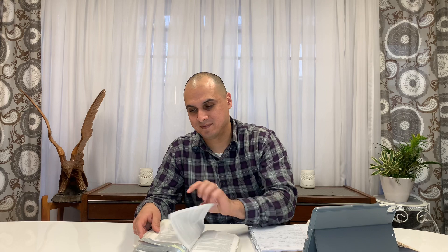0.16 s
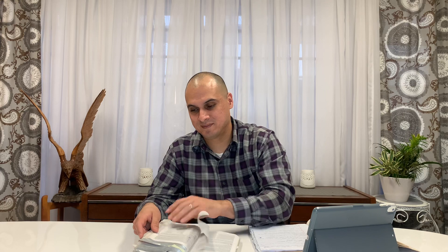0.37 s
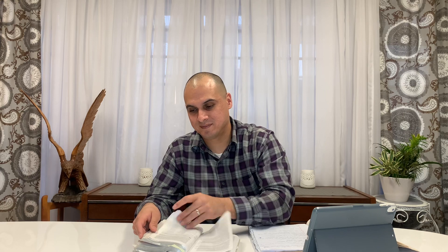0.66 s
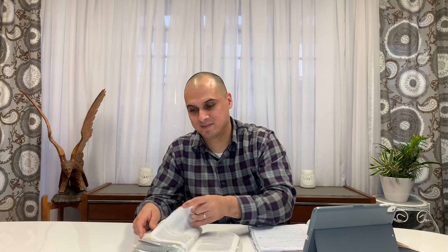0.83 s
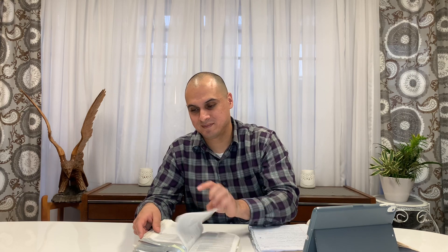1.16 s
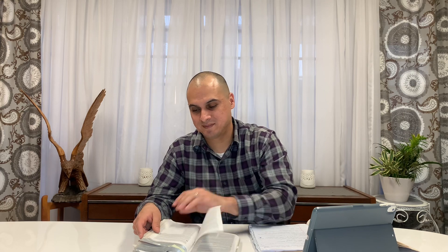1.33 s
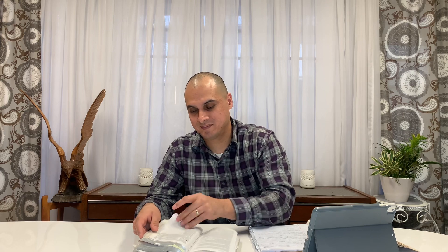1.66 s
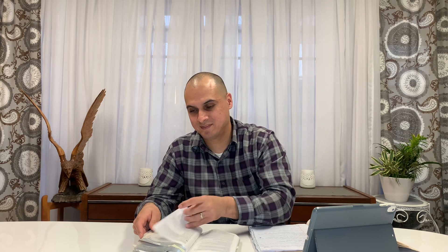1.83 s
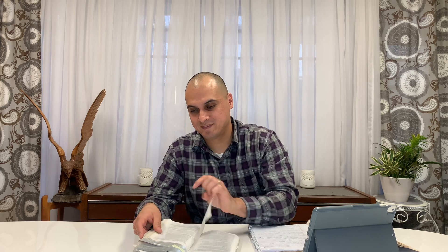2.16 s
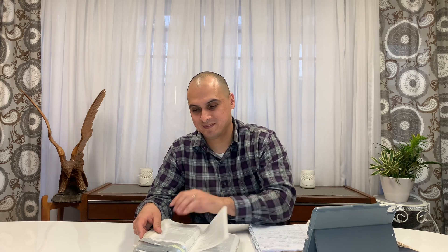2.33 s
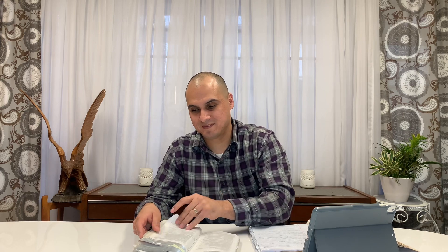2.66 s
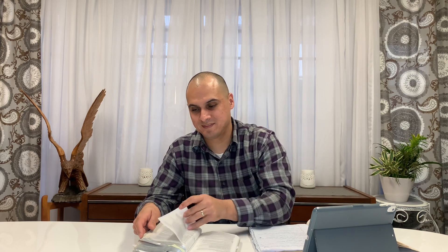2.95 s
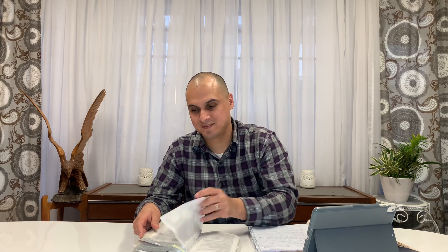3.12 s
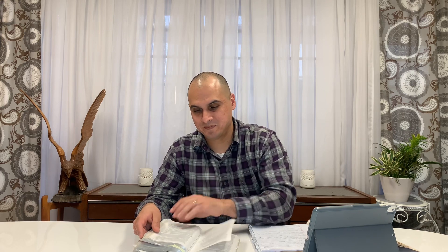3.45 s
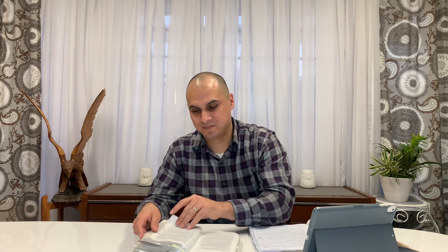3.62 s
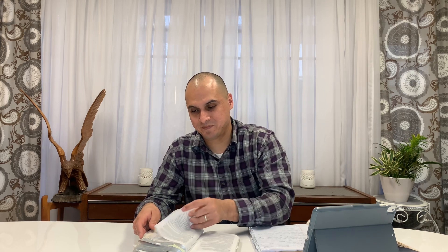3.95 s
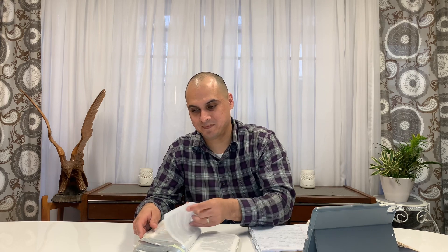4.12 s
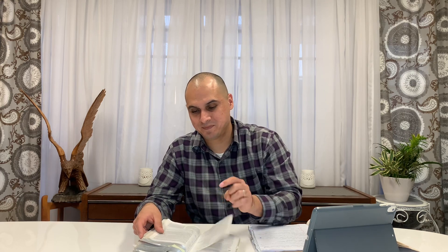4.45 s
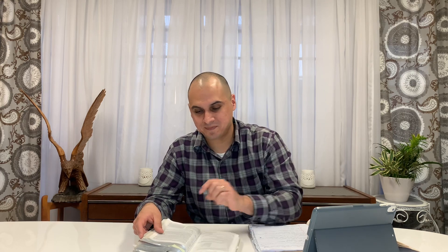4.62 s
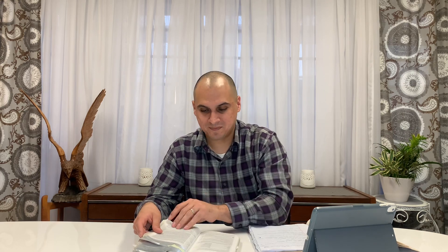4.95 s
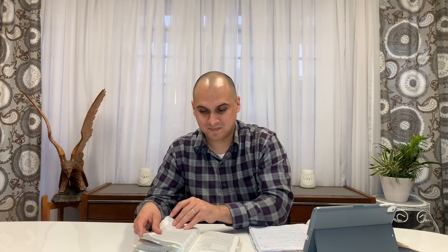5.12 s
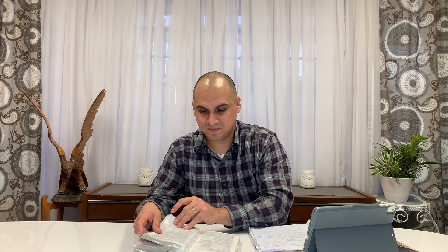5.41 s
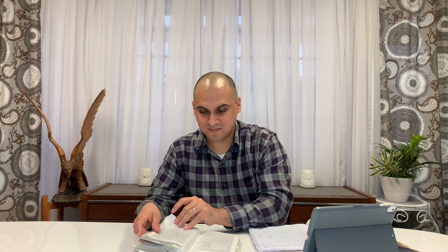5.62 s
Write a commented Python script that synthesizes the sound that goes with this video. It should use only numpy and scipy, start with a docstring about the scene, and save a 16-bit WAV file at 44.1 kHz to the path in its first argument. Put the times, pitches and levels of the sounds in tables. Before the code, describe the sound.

Thin pages of a thick book are flipped one by one, each with crisp rustles, crackles and a quick swish, in a quiet room.

```python
"""Paper hisses, rustles and crackles as someone leafs through a thick book of thin pages at a table.
Fingers slide each sheet in short strokes (shaped noise), and it buckles with tiny sharp bursts.
It whips straight and lands with a swish; flaps, low gliding notes and light touches join in.
Behind it: a short room ring, quiet air, dull table bumps and a low drone like distant traffic.
A phone a little way off hears all this through two ports, as left and right."""
import sys
import numpy as np
from scipy import signal
from scipy.fft import rfft, irfft
from scipy.io import wavfile
from scipy.ndimage import uniform_filter1d, map_coordinates

SR = 44100
rng = np.random.default_rng(int(sys.argv[2]) if len(sys.argv) > 2 else 0)


def master_out(mix):
    """Clip the mix to full scale and print it as 16-bit PCM to the path in sys.argv[1]."""
    frames = np.transpose(np.atleast_2d(mix))
    ceiling = np.clip(frames, -1, 1)
    pcm = np.round(ceiling * 32767).astype(np.int16)
    wavfile.write(sys.argv[1], SR, pcm)


N = 254898
T = np.arange(N) / SR  # time of every sample, s
FREQS = np.fft.rfftfreq(N, 1 / SR)  # Hz

# fingers slide a sheet; levels before a small trim of each layer:
# start_s, length_s, attack_s, hiss_db (rubbing surfaces), rustle_db (bending sheet)
STROKES = [(0.0, 0.11, 0.00018, -61.5, -49), (0.276, 0.16, 0.0037, -71, -59),
           (0.485, 0.034, 0.0055, -62.5, -53.5), (0.577, 0.25, 0.042, -58, -55.5),
           (0.687, 0.065, 0.029, -43.5, -49.5), (0.778, 0.1, .01, -68.5, -57.5),
           (0.867, 0.18, 0.037, -87, -61), (0.997, 0.077, 0.013, -55.5, -51.5),
           (1.524, 0.11, 0.046, -73, -67), (1.641, 0.15, 0.066, -49, -50),
           (1.742, 0.038, 0.034, -40.5, -41.5), (1.814, 0.037, .01, -75, -55),
           (1.895, 0.094, 0.079, -51, -43.5), (2.384, 0.18, 0.013, -79, -73),
           (2.529, 0.077, 0.01, -62, -70.5), (2.676, 0.25, 0.011, -55.5, -57),
           (2.942, 0.027, 0.0084, -57.5, -56), (3.046, 0.033, 0.0088, -72, -62),
           (3.101, 0.063, 0.0084, -54.5, -48.5), (3.509, 0.054, 0.0039, -81, -65),
           (3.566, 0.032, 0.0066, -66.5, -62), (3.689, 0.17, 0.012, -51, -60.5),
           (3.801, 0.075, 0.023, -40, -45.5), (3.897, 0.17, 0.0056, -62, -55),
           (4.074, 0.21, 0.0058, -86.5, -62), (4.192, 0.035, 0.0037, -67, -55.5),
           (4.249, 0.01, 0.002, -49.5, -51), (4.735, 0.077, 0.0099, -76, -70),
           (4.945, 0.6, 0.04, -86.5, -88), (5.415, 0.047, 0.03, -69, -75),
           (5.505, 0.081, 0.015, -78, -65.5), (5.564, 0.037, 0.035, -45.5, -73),
           (5.74, 0.04, 0.0073, -72, -66)]
HISS_RELEASE_S, RUSTLE_RELEASE_S = 0.03, 0.032
# a sheet slips off the finger, whips straight and brushes down onto the stack; hiss and rustle before trim:
# start_s, hiss_db, rustle_db, whip_db, settling_s
TURNS = [(0.114, -52, -49, -48, 0.16), (1.121, -51, -47.5, -40.5, 0.19), (2.009, -51.5, -49.5, -60, 0.23),
         (3.135, -49, -58, -48, 0.25), (4.257, -41, -43.5, -39, 0.16)]
TURN_ATTACK_S, TURN_HOLD_S = 0.0028, 0.036
TURN_HISS_FADE_S, TURN_RUSTLE_FADE_S, WHIP_FADE_S = 0.032, 0.044, 0.032
SETTLE_DB, SETTLE_FADE_S = -20, 0.066  # the turned sheet rustles on, this far below its sweep
# unevenness of the rustle, and the rustle level at which half of it is reached
FLEX_DB, FLEX_ONSET_DB = 7.5, -58

# single buckles and ticks, loud to very faint:
# snap_peak_s, snap_energy_db, pop_energy_db, snap_length_ms (rough), pop_ring_hz
CRACKLES = [(0.0055, -29, -22.5, 0.9, 1350), (0.022, -23, -24.5, 0.84, 2900), (0.042, -41, -30, 0.72, 4300),
            (0.0593, -44, -24.5, 1.6, 2260), (0.1107, -24, -24.5, 1.35, 4120),
            (0.1207, -13, -39, 0.72, 5000), (0.1438, -27, -19.5, 0.18, 4930),
            (0.1727, -38, -23.5, 1.8, 2460), (0.2963, -42, -29, 0.91, 2700),
            (0.308, -27, -28.5, 0.31, 4950), (0.5063, -34, -40, 0.8, 5300), (0.5165, -37, -43, 0.39, 2400),
            (0.561, -39, -51, 0.35, 5500), (0.7145, -5.5, -20.5, 0.51, 6100),
            (0.7448, -10, -32, 0.72, 6030), (0.753, -26.5, -20, 1.26, 2830),
            (0.7595, -28, -24.5, 1.33, 2510), (0.7707, -30, -22.5, 0.22, 1720),
            (0.7877, -19.5, -30, 0.41, 5990), (0.7944, -20, -22.5, 0.43, 4740), (0.8, -24, -27, 0.44, 5730),
            (0.823, -20, -20.5, 2.14, 5000), (0.974, -59, -32, 0.66, 1800),
            (1.0098, -25, -22.5, 0.98, 1440), (1.0142, -32, -17, 0.47, 5900),
            (1.0219, -14, -17, 0.45, 1360), (1.083, -20, -19.5, 0.35, 4500), (1.12, -34, -20, 0.72, 2200),
            (1.125, -11, -15, 1.66, 1530), (1.1266, -8.5, -22.5, 1.1, 2160), (1.139, -16, -14, 1.75, 4800),
            (1.607, -49, -36, 1.9, 2700), (1.6748, -25, -46, 0.25, 5990), (1.7648, -12.5, -29, 0.51, 2240),
            (1.7745, -15, -21.5, 0.79, 2640), (1.785, -16, -20.5, 0.71, 1270),
            (1.8474, -25, -31, 0.47, 3100), (1.904, -43, -27.5, 1.3, 1250),
            (1.9142, -16.5, -19, 0.96, 1390), (1.972, -25, -28, 0.68, 5700), (2.0077, -24, -23, 1.38, 3760),
            (2.0239, -17, -23.5, 0.83, 2820), (2.0333, -29, -25.5, 1.24, 2300),
            (2.4064, -34.5, -34.5, 0.55, 2430), (2.436, -43, -41.5, 0.55, 2820),
            (2.455, -46, -48, 0.79, 4000), (2.5475, -24.5, -35.5, 0.89, 5990),
            (2.5535, -25, -28.5, 0.52, 6000), (2.5995, -23.5, -34, 0.9, 6050), (2.7, -29, -37, 0.55, 5170),
            (2.716, -29, -27, 1.15, 5670), (2.8719, -25, -27.5, 0.6, 3140), (2.9482, -19, -27, 0.35, 5730),
            (2.9518, -22.5, -22.5, 1.07, 1010), (2.969, -37, -34, 0.56, 4600),
            (2.978, -38, -29.5, 0.8, 2100), (2.9976, -23.5, -36, 0.54, 4990),
            (3.007, -42, -28.5, 0.85, 1590), (3.062, -40, -29.5, 1.1, 1240), (3.081, -41, -31, 1.3, 1300),
            (3.11, -17.5, -24, 1.32, 5730), (3.1311, -33, -21, 0.89, 5330), (3.1429, -18, -14, 1.75, 4740),
            (3.1528, -32, -15, 0.7, 4540), (3.1556, -10.5, -13, 0.49, 4050),
            (3.4612, -31.5, -38.5, 0.43, 3440), (3.5887, -29, -37, 0.71, 4780),
            (3.6995, -23, -27.5, .8, 2500), (3.704, -15.5, -28, 0.9, 2520), (3.714, -23, -36, 0.51, 2500),
            (3.7772, -19.5, -25, 0.45, 5990), (3.839, -4.5, -12.5, 1.06, 5600),
            (4.004, -43, -29.5, 0.94, 2370), (4.0431, -22, -42, 0.46, 4830), (4.088, -47, -38, 0.71, 5730),
            (4.1956, -27, -20.5, 1.2, 1890), (4.1967, -23.5, -23.5, 1.5, 4800), (4.259, -7, -9, 0.6, 4520),
            (4.2596, -30.5, -19.5, 0.93, 1310), (4.2679, -18, -30, 1.6, 3700),
            (4.487, -40, -35, 0.46, 3450), (4.768, -43.5, -43, 1.1, 5270), (4.775, -42.5, -43, 0.4, 5300),
            (4.833, -45.5, -47, 0.46, 4000), (5.297, -50, -58, 0.4, 2830), (5.5125, -27, -41, 0.61, 4980),
            (5.516, -34, -41, 0.65, 4910), (5.55, -25, -35, 0.45, 5770), (5.5653, -22, -33, 0.32, 4120),
            (5.598, -19.5, -35, 1.2, 4570), (5.6001, -21, -29.5, 0.89, 4274), (5.623, -17, -28, 0.64, 5900)]
POP_STRETCH = 2.37  # pop length over snap length
POP_RING_DB, POP_RING_WIDTH = 13, 0.087  # height of a pop's ring; half-width as a share of its pitch
# small buckles at random times; energies relative to hiss and rustle, shifted by up to the spread
# around 5 dB below these values
SMALL_PER_S, SMALL_MS, SMALL_SNAP_DB, SMALL_POP_DB, SMALL_SPREAD_DB = 160, 0.16, 11, 10.5, 10
SMALL_LOWEST_HZ, SMALL_HIGHEST_HZ = 990, 6000  # range of pop rings

# the sheet flexes and flaps, low and hollow: start_s, level_db, fading_s
FLAPS = [(0.0, -54.5, 0.054), (0.415, -66.5, 0.032), (0.8, -57, 0.072), (1.005, -61.5, 0.026),
         (1.124, -68.5, 0.01), (1.765, -51.5, 0.053), (1.912, -39, 0.0043), (1.93, -64, 0.064),
         (1.985, -44, 0.0092), (2.71, -64.5, 0.34), (2.948, -46, 0.015), (3.14, -58.5, 0.035),
         (3.583, -57.5, 0.015), (3.70, -56.5, 0.14), (3.837, -43, 0.0051), (3.9, -62.5, 0.14),
         (4.258, -39.5, 0.012), (5.598, -57.5, 0.024)]
FLAP_SHARE_DB = -18.5  # flapping that follows the rustle, relative to it
# low, hollow notes of the arched sheet: start_s, length_s, level_db, from_hz, to_hz
BILLOWS = [(0.0, 0.02, -57.5, 366, 414), (0.066, 0.067, -71, 370, 330), (1.009, 0.074, -70.5, 399, 330),
           (1.932, 0.06, -62, 251.5, 317), (2.008, 0.092, -71.5, 240.5, 271), (2.954, 0.03, -64, 440, 375),
           (3.831, 0.016, -57, 410, 402), (4.241, 0.032, -59.5, 400, 354)]
BILLOW_WOBBLES_PER_S, BILLOW_ATTACK_S, BILLOW_RELEASE_S = 180, 0.0027, 0.011
# light touches of the hand on the book: start_s, energy_db, ring_hz, fading_ms
TAPS = [(1.392, -45, 2400, 2), (1.4418, -44, 1340, 2.5), (1.465, -47.5, 1800, 2), (1.554, -52, 1060, 2),
        (2.214, -43, 2000, 2.9), (2.272, -44, 2412, 3), (2.388, -45, 2300, 2.4), (3.337, -44, 2205, 2),
        (3.523, -44, 1500, 2), (4.724, -42.5, 3250, 1.6), (4.753, -38, 4120, 1.34), (4.768, -36, 1890, 1.3),
        (4.774, -41, 2100, 1.3), (4.833, -39, 1460, 1.1), (4.893, -38, 3590, 1.6),
        (4.975, -52.5, 2350, 2.5), (5.022, -51.5, 3936, 1.6), (5.061, -52, 2490, 1.87),
        (5.09, -46.5, 3390, 4), (5.096, -37.5, 2000, 3.7), (5.23, -51.5, 1807, 1.5),
        (5.296, -49.5, 2800, 2.1), (5.315, -49, 3200, 2), (5.745, -42.5, 1480, 2.34)]
TAP_RING_DB_PER_MS, TAP_RING_HZ = 7, 260  # a longer touch has a clearer pitch; half-width of its ring

# sound colours, only their shape counts: frequency_hz, relative_level_db
HISS = [(400, -45), (2500, -26.5), (5500, -12.5), (7000, -4.5), (9200, 2), (11000, -1.5), (12500, -4),
        (14500, -3.5), (15600, -21.5), (16300, -38)]
RUSTLE = [(40, -29.5), (250, -13.5), (400, -6), (600, -14), (820, -7), (1050, -6), (1350, -4), (2400, 0),
          (3300, -0.5), (4700, -2), (6500, -1.5), (9000, -17), (15000, -24)]
SNAP = [(400, -41.5), (2500, -35.5), (5500, -4.5), (7000, -3), (8300, 3), (9500, 1), (11000, 0.5),
        (12000, -14.5), (13300, 0.5), (14500, -10), (15600, -12), (16300, -29)]
WHIP = [(600, -13.5), (1100, -38), (2200, -3), (3100, -1), (4600, 14), (6500, 11), (9000, -24),
        (15000, -27)]
FLAP = [(30, -26.5), (130, 1), (250, -2), (370, -3), (500, -5), (630, -3.5), (820, 5), (1020, 2), (1300, 2),
        (2000, -5.5), (5000, -35.5)]
TAP = [(300, -35), (700, -32), (1400, 2), (1950, 3.5), (3500, -0.5), (4500, -2), (8000, -8), (14000, -21)]
BUMP = [(20, -20.5), (40, -6.5), (70, 2.5), (125, 0.5), (200, -8), (260, -15.5), (600, -45), (2000, -54)]
AIR = [(22, -21.5), (40, -11), (62, 1.5), (100, -0.5), (150, -11.5), (250, -21), (450, -29), (800, -34.5),
       (2000, -40), (6000, -45.5), (10000, -44), (16000, -55.5)]
# echo from all round, a change of colour: frequency_hz, relative_level_db
AROUND = [(200, 3.5), (1000, 3), (3000, 2.5), (6000, 6), (9000, 6.5), (15000, -3.5)]

# time for the room's ring to fall by 60 dB: frequency_hz, ring_time_s
ROOM_T60_S = [(200, 0.36), (800, 0.3), (2200, 0.39), (4500, 0.34), (7000, 0.34), (10000, 0.042),
              (16000, 0.059)]
# balance of the ring across pitch, before its mix level: frequency_hz, relative_level_db
ROOM_DB = [(200, -0.5), (800, -6), (2500, -3), (4500, -9), (9000, -17), (15000, -37)]
# the phone's two ports hear the book differently
# frequency_hz, left_lead_radians
PORT_PHASE = [(100, 0), (1800, .7), (3000, 1.9), (5000, 2.2), (5900, 3.2), (7800, 2.8), (8600, .7),
              (9600, 0), (11500, -2.9), (12200, -3.2), (13400, -6.1), (14700, -6.5), (15500, -9)]
# frequency_hz, left_minus_right_db
PORT_BALANCE = [(100, 2.5), (500, -3), (1200, 0.5), (2500, -2), (4800, -4.5), (7000, -4), (9000, 1),
                (15000, -2)]
TOP_HZ = 16300

# distant drone, before random wandering and trim: time_s, pitch_hz, level_db
DRONE = [(0, 63.23, -67), (.9, 62.66, -63.5), (1.12, 49.4, -50), (1.33, 56.3, -56.5), (1.55, 60.26, -44.5),
         (1.8, 61.43, -47), (2.0, 62.44, -47), (2.3, 63, -48.5), (2.55, 60.3, -54), (2.9, 64.2, -63),
         (3.8, 62.57, -62.5), (4.35, 62.5, -69), (5.0, 62.76, -76), (5.78, 65.9, -57)]
# dull bumps of arms and book on the table, before the port trim: start_s, level_db
BUMPS = [(0.36, -57), (2.0, -61), (2.17, -71.5), (3.241, -64.5), (3.49, -55.5), (3.7, -57.5), (4.082, -57),
         (4.36, -60.5), (4.529, -66.5), (4.731, -60), (5.28, -78), (5.57, -54.5), (5.7, -59.5)]
AIR_DB = -61  # before the port trim


def motion():
    """How strongly the paper hisses and rustles: finger strokes, then the turn and its settling."""
    hiss_power, rustle_power = np.zeros(N), np.zeros(N)
    for s, length_s, attack_s, hiss_db, rustle_db in STROKES:
        hiss_power += (amp(hiss_db) * envelope(s, length_s, attack_s, HISS_RELEASE_S)) ** 2
        rustle_power += (amp(rustle_db) * envelope(s, length_s, attack_s, RUSTLE_RELEASE_S)) ** 2
    for s, hiss_db, rustle_db, _, settle_s in TURNS:
        hiss_power += (amp(hiss_db) * envelope(s, TURN_HOLD_S, TURN_ATTACK_S, TURN_HISS_FADE_S)) ** 2
        sweep = envelope(s, TURN_HOLD_S, TURN_ATTACK_S, TURN_RUSTLE_FADE_S)
        settle = amp(SETTLE_DB) * envelope(s, settle_s, TURN_ATTACK_S, SETTLE_FADE_S)
        rustle_power += amp(rustle_db) ** 2 * (sweep ** 2 + settle ** 2)
    return np.sqrt(hiss_power), np.sqrt(rustle_power)


def sliding(hiss, rustle):
    """Paper slides in small jerks: the surfaces hiss and the bending sheet rustles."""
    jerks = unit(amp(2.0 * walk(rate=100)))
    slips = jerks * friction(grain_rate=450, spread_db=6.0, grain_db=-5.0)
    slips = bend(slips, depth_db=4, rate=70, width_hz=260)
    # the sheet gives way unevenly, more so the harder it is bent
    unevenness_db = FLEX_DB * rustle / (rustle + amp(FLEX_ONSET_DB))
    steps = amp(unevenness_db * walk(rate=70))
    flexing = steps / np.sqrt(uniform_filter1d(steps ** 2, size=2048))  # keeps the local loudness
    hissing = colour(slips, HISS) * hiss * amp(0.5)
    rustling = colour(slips, RUSTLE) * flexing * rustle * amp(-2.5)
    return hissing + rustling


def friction(grain_rate, spread_db, grain_db):
    """Countless fibres slipping as smooth noise, and among them single catches of uneven size."""
    sizes = amp(spread_db * np.minimum(rng.exponential(size=N), 3))
    catches = (rng.random(N) < grain_rate / SR) * sizes
    fading = signal.lfilter([1], [1, -np.exp(-1 / (0.00087 * SR))], catches)  # each fades in 0.87 ms
    grains = fading * rng.standard_normal(N)
    return unit(rng.standard_normal(N) + amp(grain_db) * unit(grains))


def bend(x, depth_db, rate, width_hz):
    """A bending sheet keeps changing its resonances: patches of the spectrum swell and sink."""
    hz, s, cells = signal.stft(x, SR, nperseg=512)
    place = np.meshgrid(hz / width_hz, s * rate, indexing='ij')
    patches = map_coordinates(rng.standard_normal((256, 1024)), place, order=2, mode='wrap')
    return signal.istft(cells * unit(amp(depth_db * patches)), SR)[1][:N]


def crackles(hiss, rustle):
    """Each buckle is a crisp snap and a duller, longer pop; small ones are strewn among the listed ones."""
    buckles = [(s, amp(snap_db), amp(pop_db), ms, hz) for s, snap_db, pop_db, ms, hz in CRACKLES]
    buckles += small_buckles(hiss, rustle)
    out = np.zeros(N)
    for s, snap, pop, ms, hz in buckles:
        snap_noise, pop_noise = rng.standard_normal(size=(2, 1024))
        start = s - 512 / SR - ms / 1000 / 3  # allow for the leading silence and the snap's rise
        add(out, start, snap * buckle(snap_noise, ms, SNAP))
        add(out, start, pop * buckle(pop_noise, POP_STRETCH * ms, RUSTLE, hz, POP_RING_DB))
    return out


def small_buckles(hiss, rustle):
    """Fine buckles come at chance moments, as strong as the hiss and rustle of the sheet allow."""
    count = int(SMALL_PER_S * N / SR)
    places = rng.integers(N, size=count)
    sizes = amp(SMALL_SPREAD_DB * (2 * rng.random(size=(count, 2)) - 1.5))
    rings = rng.uniform(SMALL_LOWEST_HZ, SMALL_HIGHEST_HZ, size=count)
    snaps = hiss[places] * sizes[:, 0] * amp(SMALL_SNAP_DB)
    pops = rustle[places] * sizes[:, 1] * amp(SMALL_POP_DB)
    return [(T[i], snap, pop, SMALL_MS, hz) for i, snap, pop, hz in zip(places, snaps, pops, rings)]


def buckle(noise, ms, spectrum, ring_hz=1, ring_db=0):
    """A burst of energy 1, about ms long, then a short shiver of the sheet; the patch may ring."""
    t = T[:len(noise)]
    rise_s = ms / 1000 / 3
    pulse = t / rise_s * np.exp(1 - t / rise_s)
    shiver = amp(-20) * np.exp(-t / .004)
    burst = np.pad(noise * (pulse + shiver), (512, 0))  # the colouring also spreads backwards in time
    hz = np.fft.rfftfreq(len(burst), 1 / SR)
    ring = ring_db / (1 + ((hz / ring_hz - 1) / POP_RING_WIDTH) ** 2)
    burst = irfft(rfft(burst) * amp(at(spectrum, hz) + ring))
    return burst / np.linalg.norm(burst)


def swishes(table, spectrum, following=0):
    """Sudden sweeps of a sheet: grainy noise that starts within milliseconds and fades.
    A further part may follow a given level, such as that of the rustle."""
    t, swell = T[:SR // 2], np.zeros(N)
    for s, db, fading_s in table:
        add(swell, s, amp(db) * (1 - np.exp(-t / 0.0026)) * np.exp(-t / fading_s))
    grainy = friction(grain_rate=800, spread_db=4.5, grain_db=1.5)
    flutter = bend(grainy, depth_db=-2.5, rate=120, width_hz=250)
    return colour(flutter, spectrum) * np.hypot(swell, following)


def billows():
    """The curved sheet sounds a low, breathy resonance that glides as its arch changes."""
    out = np.zeros(N)
    for s, length_s, db, from_hz, to_hz in BILLOWS:
        pitch_hz = np.interp(T, [s, s + length_s], [from_hz, to_hz])
        phase = 2 * np.pi * np.cumsum(pitch_hz) / SR
        # two random swells make the note breathy
        wobble = walk(BILLOW_WOBBLES_PER_S) * np.cos(phase) + walk(BILLOW_WOBBLES_PER_S) * np.sin(phase)
        out += amp(db) * unit(wobble) * envelope(s, length_s, BILLOW_ATTACK_S, BILLOW_RELEASE_S)
    return out


def taps():
    """Faint, dry touches that ring for a few milliseconds, each at the pitch of the touched spot."""
    t, out = T[:2048], np.zeros(N)
    hz = np.fft.rfftfreq(len(t), 1 / SR)
    for s, db, ring_hz, ms in TAPS:
        ring_db = TAP_RING_DB_PER_MS * ms / (1 + ((hz - ring_hz) / TAP_RING_HZ) ** 2)
        touch = rng.standard_normal(len(t)) * np.exp(-1000 * t / ms)
        touch = irfft(rfft(touch) * amp(at(TAP, hz) + ring_db))
        touch *= np.minimum(1, 4 * (1 - t / t[-1]))  # smooth end
        add(out, s, amp(db) * touch / np.linalg.norm(touch))
    return out


def room_ring(x, count=8):
    """The room's diffuse echo, shortest in the treble; a wandering mix of tails, as for a moving page."""
    t, tails = T[:SR // 2], 0
    for k, band in enumerate(bands(rng.standard_normal(N), count=10)):
        hz = (k / 10) ** 2 * SR / 2
        fade = amp(-60 * t / at(ROOM_T60_S, hz)) * np.clip((t - .002) / .006, 0, 1)  # starts after 2 ms
        noises = band[:count * len(t)].reshape(count, len(t))
        tails = tails + noises * fade / np.linalg.norm(fade) * amp(at(ROOM_DB, hz))
    shares = np.array([walk(rate=16) for _ in range(count)])
    shares = shares / np.linalg.norm(shares, axis=0)
    return signal.fftconvolve(x * shares, tails, axes=1).sum(0)[:N]


def ports(x):
    """Sound from the book's side reaches the two ports with different phase and level."""
    half = amp(at(PORT_BALANCE, FREQS) / 2) * np.exp(.5j * at(PORT_PHASE, FREQS))
    return irfft(rfft(x) * np.array([half, 1 / half]), N)


def background():
    """Room air, drone and bumps, with a small level difference between the ports."""
    return (room_air() + drone() + bumps()) * amp([[-1.3], [1.2]])


def room_air():
    """Quiet air noise: nearly alike at both ports in the bass, mostly separate in the treble."""
    shared, left, right = (colour(rng.standard_normal(N), AIR) for _ in range(3))
    apart = at([(60, 0.087), (200, 0.6), (800, 0.96)], FREQS)  # (Hz, separate share)
    return amp(AIR_DB) * irfft(rfft(shared) * np.sqrt(1 - apart ** 2) + rfft([left, right]) * apart, N)


def drone():
    """A low tone swells and fades like distant traffic, wavering in pitch and level."""
    s, hz, db = np.transpose(DRONE)
    pitch_hz = np.interp(T, s, hz) + 1.3 * walk(rate=6.4)
    level_db = np.interp(T, s, db) + 2.54 * walk(rate=11) - 4.5
    return np.sqrt(2) * np.sin(2 * np.pi * np.cumsum(pitch_hz) / SR) * amp(level_db)


def bumps():
    """Arms and book knock dully on the table: swells of low noise over a faint steady rumble."""
    leaning = sum(amp(db) * envelope(s, hold_s=0.039, attack_s=0.013, release_s=0.088) for s, db in BUMPS)
    return colour(rng.standard_normal(N), BUMP) * np.hypot(leaning, amp(-71))


def amp(db):
    """Decibels to gain."""
    return 10 ** (np.asarray(db) / 20)


def unit(x):
    """Scale to an average strength (rms) of 1."""
    return x / np.sqrt(np.mean(x ** 2))


def envelope(s, hold_s, attack_s, release_s):
    """Rise from time s, hold, then fade."""
    t = np.maximum(T - s, 0)
    return (1 - np.exp(-t / attack_s)) * np.exp(-np.clip((t - hold_s) / release_s, 0, 20))


def at(points, hz):
    """Read (Hz, value) points on a log-frequency axis."""
    f, value = np.transpose(points)
    return np.interp(np.log(hz + 1), np.log(f), value)


def colour(x, spectrum):
    """Give x a spectrum; white input keeps its power."""
    return irfft(rfft(x) * unit(amp(at(spectrum, FREQS))), N)


def walk(rate):
    """Smooth random wandering, spread near 1, through `rate` random points a second."""
    knots = rng.standard_normal(4096)
    return 0.97 * map_coordinates(knots, [T * rate], order=2, mode='wrap')


def bands(x, count):
    """Split x into overlapping bands that add up to x again, narrower in the bass."""
    place = np.sqrt(FREQS / FREQS[-1]) * count
    spectrum = rfft(x)
    return [irfft(spectrum * np.maximum(1 - abs(place - k), 0), N) for k in range(count + 1)]


def add(track, s, sound):
    """Mix a sound into a track from time s on."""
    start = max(int(s * SR), 0)
    part = sound[:max(N - start, 0)]
    track[start:start + len(part)] += part


def delayed(x, ms):
    """x heard over a path whose delay changes."""
    return map_coordinates(x, [(T - ms / 1000) * SR], order=3)


def scene():
    """The paper, its echo from the table's side, the echo from all round, and the background."""
    hiss, rustle = motion()
    whips = swishes([(s, db, WHIP_FADE_S) for s, _, _, db, _ in TURNS], WHIP)
    flaps = swishes(FLAPS, FLAP, following=amp(FLAP_SHARE_DB) * rustle)
    paper = sliding(hiss, rustle) + crackles(hiss, rustle) + whips + flaps + billows() + taps()
    left, right = ports(paper + amp(-11.5) * room_ring(paper))
    sway_ms = .011 * walk(rate=5)  # the page swings from side to side
    near = np.array([left, delayed(right, sway_ms)])
    scattered = amp(1.5) * colour(paper, AROUND)
    around = np.array([room_ring(scattered), room_ring(scattered)])  # a separate echo for each port
    return near + around + background()


def record(dry):
    """The phone cuts the top with a steep low-pass filter."""
    return signal.sosfilt(signal.ellip(8, .2, 70, TOP_HZ, fs=SR, output="sos"), dry)


dry = scene()
out = record(dry)
master_out(out)
```